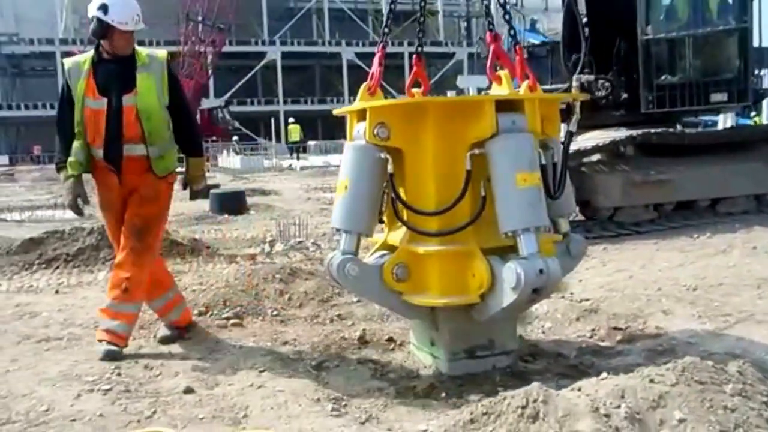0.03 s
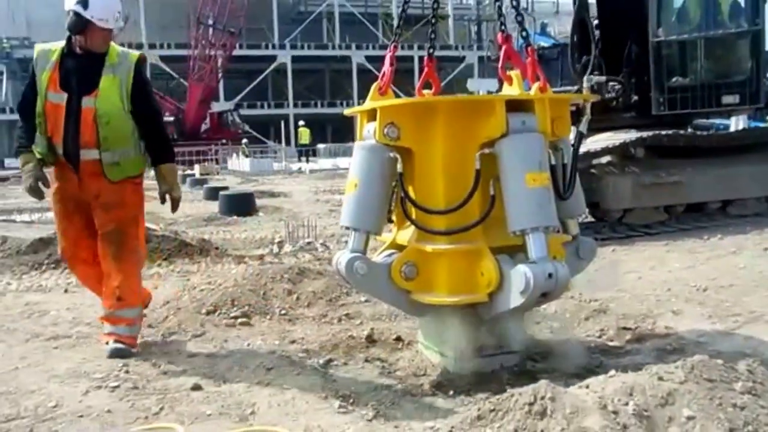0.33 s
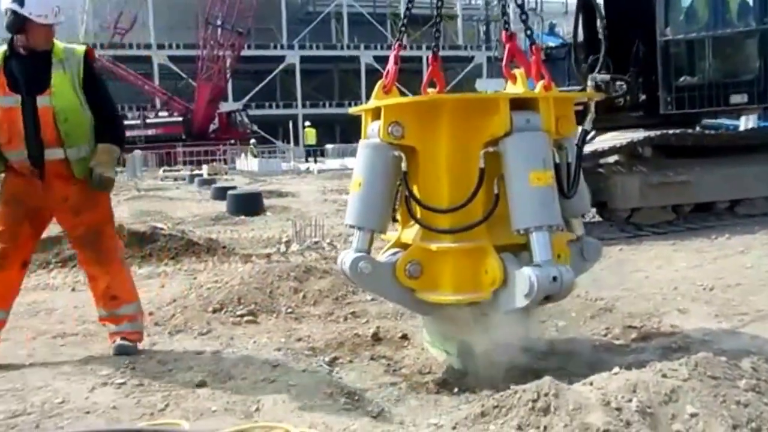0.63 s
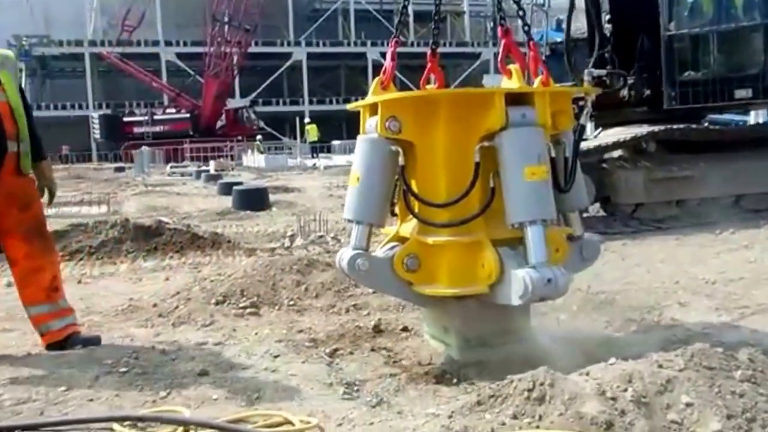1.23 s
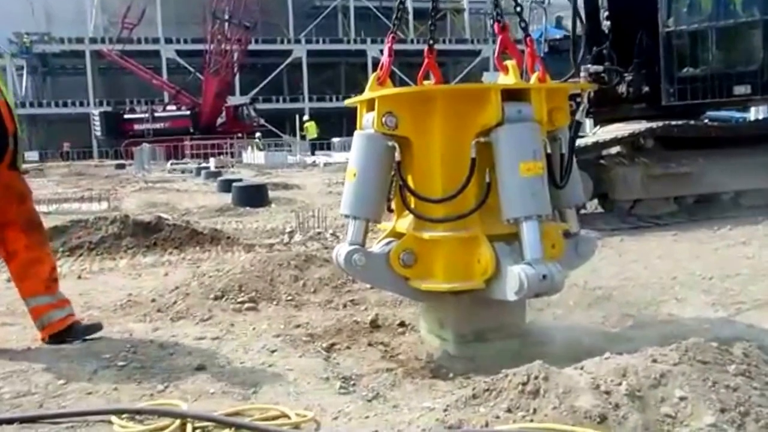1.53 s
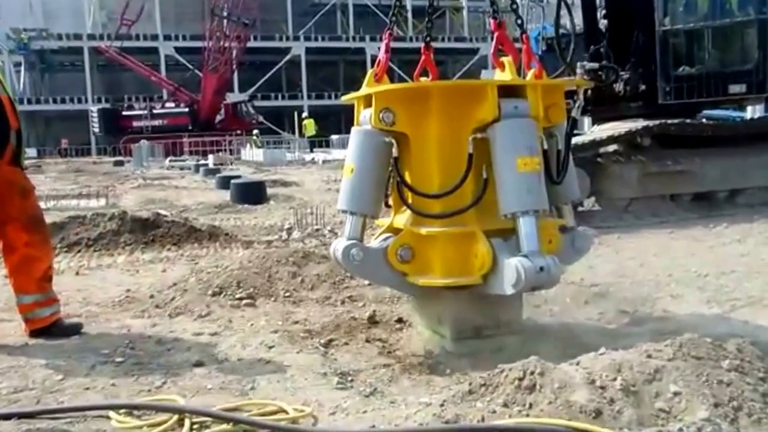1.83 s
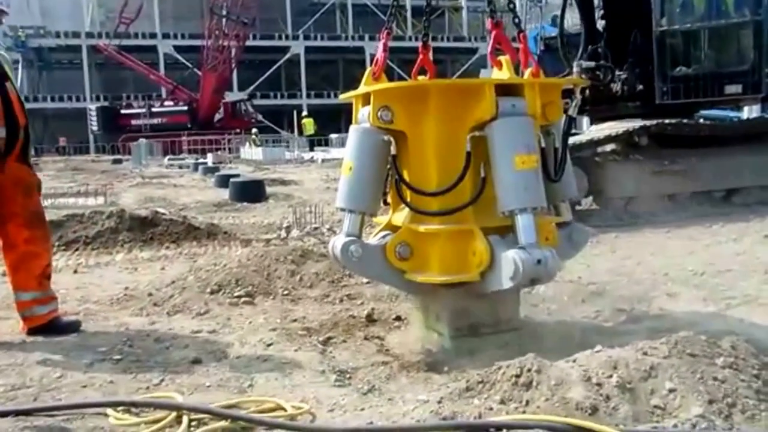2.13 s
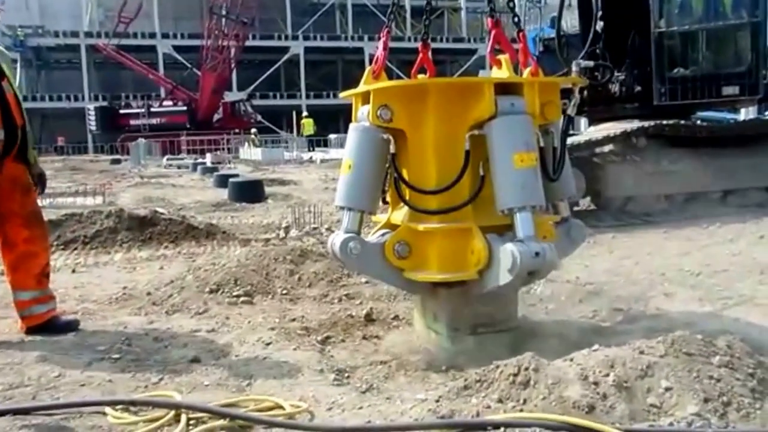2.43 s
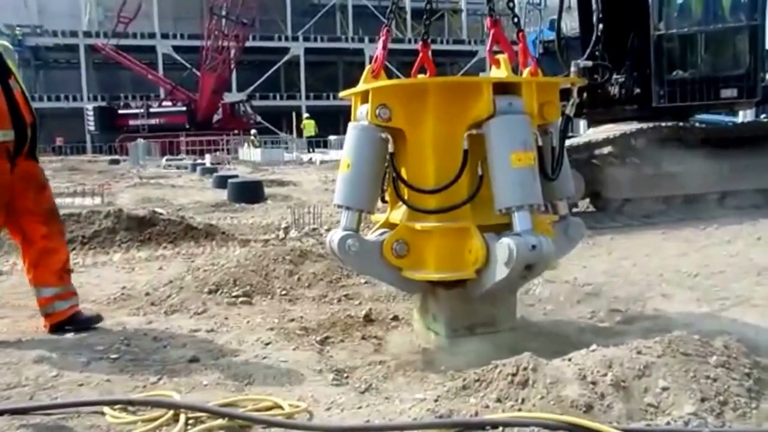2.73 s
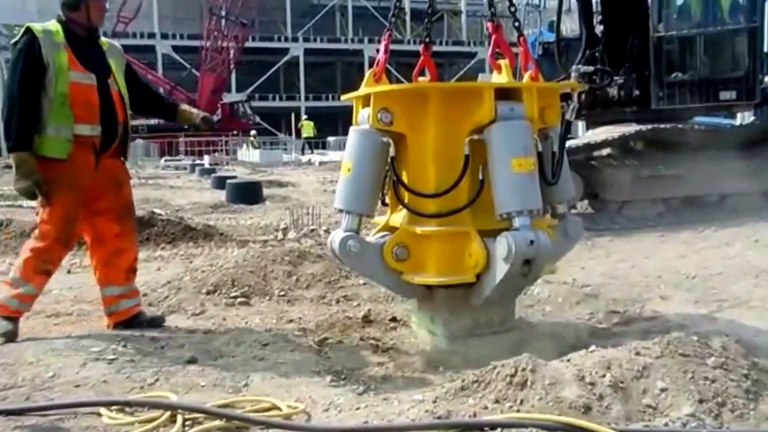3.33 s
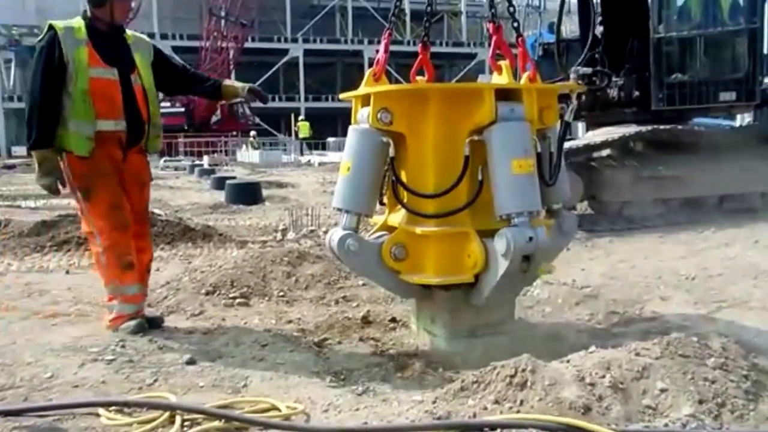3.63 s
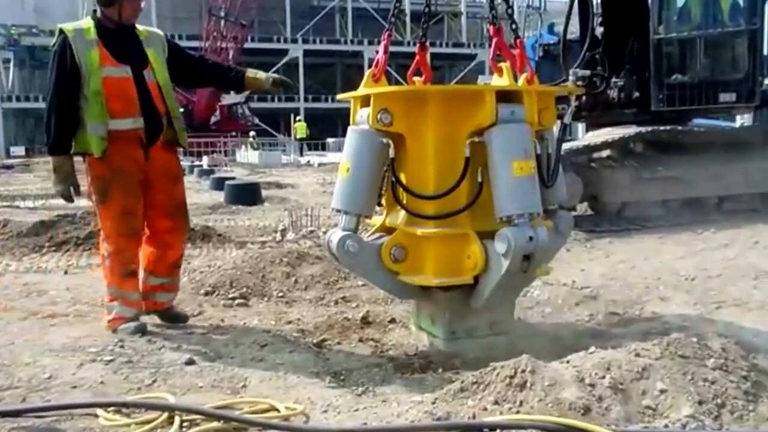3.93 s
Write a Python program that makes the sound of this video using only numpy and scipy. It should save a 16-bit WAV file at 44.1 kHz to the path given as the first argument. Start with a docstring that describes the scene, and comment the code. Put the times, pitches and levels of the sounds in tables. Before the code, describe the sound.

A concrete pile cracks with a loud, thudding crunch in a hydraulic breaker close by. Chunks crumble and fall, steel groans and chains rattle briefly, leaving an excavator's diesel rumble and faint pump whine on a building site.

```python
"""Breaking a concrete pile

A hydraulic breaker bites into concrete: three cracks, each with a thud, overload the microphone.
The fractures excite the modes of the steel frame, which also groans as the jaws slip. Concrete
crumbles, chips snap off, gravel trickles and the lifting chains rattle. Behind it are a thin hiss
and the excavator's diesel; its pump whines while holding pressure, then while driving the rams."""
import sys
import numpy as np
from scipy import signal
from scipy.fft import rfft, irfft
from scipy.io import wavfile

SR = 44100
rng = np.random.default_rng(int(sys.argv[2]) if len(sys.argv) > 2 else 0)


def to_wav(sig):
    """Store sig (one row per channel, or 1-D mono) as 16-bit WAV at the path in sys.argv[1].

    Samples outside -1..1 are clipped; the rate is SR.
    """
    pcm = np.clip(np.atleast_2d(sig), -1, 1) * 32767
    pcm = np.round(pcm).astype(np.int16)
    wavfile.write(sys.argv[1], SR, pcm.T)  # frames by channels


N = 176400
T = np.arange(N) / SR
CUTOFF_HZ, SNAP_ATTACK_S = 14400, 0.0006

# left-right coherence of nearby sources: (frequency [Hz], correlation [-1..1])
NEAR_COHERENCE = [(60, 0.99), (700, 1), (1240, 0.98), (2300, .87), (4200, 0.86), (7700, 0.32),
                  (14000, 0.18)]
# spectrum of small hard impacts: (frequency [Hz], relative density [dB])
SNAP_SPECTRUM = [(300, -6), (1000, 10.5), (2000, 2), (3500, 5), (6000, -0.5), (9000, 1), (14000, 4.5)]


def from_db(db):
    """Amplitude ratio of a level in decibels."""
    return 10 ** (np.asarray(db) / 20)


def unit_rms(x):
    """Normalisation to an rms of 1."""
    return x / np.sqrt(np.mean(x ** 2) + 1e-20)


def contour(rows):
    """Gain interpolated between (time [s], level [dB]) rows."""
    return from_db(np.interp(T, *np.transpose(rows)))


def at_hz(rows, hz):
    """Interpolation on a logarithmic frequency axis."""
    frequencies, values = np.transpose(rows)
    return np.interp(np.log(hz + 1), np.log(frequencies), values)


def drift(corner_hz):
    """Random modulation: low-passed noise with an rms of 1."""
    step, settle = 40, 2000  # audio samples per point; points discarded
    pole = np.exp(-2 * np.pi * corner_hz * step / SR)
    noise = rng.standard_normal(N // step + settle + 2)
    slow = signal.lfilter([1], [1, -2 * pole, pole * pole], noise)[settle:]
    return np.interp(np.arange(N) / step, np.arange(len(slow)), unit_rms(slow))


def burst(start, attack, hold, t60):
    """Transient envelope: linear attack, hold and exponential decay, all in seconds."""
    rise = np.clip((T - start) / attack, 0, 1)
    return rise * np.exp(-np.log(1000) * np.clip((T - start - attack - hold) / t60, 0, 2))


def ring(force, modes):
    """Modal superposition: each mode responds to the force as a damped oscillator."""
    response = 0
    for hz, db, t60 in modes:
        radius, angle = np.exp(-np.log(1000) / (t60 * SR)), 2 * np.pi * hz / SR
        feedback = [1, -2 * radius * np.cos(angle), radius ** 2]
        response += from_db(db) * signal.lfilter([0, np.sin(angle)], feedback, force + 1e-18)
    return response


def grit(per_s, spread_db, dust_db):
    """Shot noise: tiny uneven fractures over fine dust, as two signals with shared timing."""
    events = rng.random(N) < per_s / SR
    sizes = from_db(spread_db * np.minimum(rng.exponential(1, N), 4))
    impulses = unit_rms(events * sizes * rng.choice([-1, 1], (2, N)))
    return impulses + from_db(dust_db) * rng.standard_normal((2, N))


def colour(pair, spectrum, coherence, balance=None):
    """Minimum-phase filtering and mid-side mixing turn two uncorrelated signals into stereo of rms 1."""
    hz = np.fft.rfftfreq(N, 1 / SR)
    cepstrum = irfft(np.log(from_db(at_hz(spectrum, hz))), N)
    cepstrum[1:N // 2] *= 2  # folding makes the filter causal
    cepstrum[N // 2 + 1:] = 0
    mid, side = rfft(pair) * np.exp(rfft(cepstrum)) * (hz < CUTOFF_HZ)
    correlation = np.clip(at_hz(coherence, hz), -0.999, 0.999)
    sign = np.array([[1], [-1]])
    stereo = np.sqrt(1 + correlation) * mid + sign * np.sqrt(1 - correlation) * side
    if balance:
        stereo *= from_db(sign * at_hz(balance, hz) / 2)
    return unit_rms(irfft(stereo, N))


def tone(hz, harmonics, flutter_db):
    """Harmonic series on a moving fundamental; each partial flutters independently in level."""
    phase = 2 * np.pi * np.cumsum(hz) / SR
    partials = 0
    for number, db in harmonics:
        gain = from_db(db + flutter_db * drift(7.2))
        partials += gain * np.sin(number * phase + rng.uniform(0, 2 * np.pi))
    return np.sqrt(2) * partials


def hiss():
    """Band noise: a steady hiss and a higher, swelling sizzle, placed by time and level differences."""
    # steady band and higher band: (frequency [Hz], relative density [dB])
    hiss_spectrum = [(3500, -20), (5000, -10), (5600, 3.5), (6400, -5), (7700, -5), (10000, -22),
                     (14000, -22)]
    sizzle_spectrum = [(7000, -36), (10000, -11.5), (11300, -1), (12700, 3.5), (14000, -2.5)]
    # swell of the sizzle: (time [s], level [dB])
    swell = [(0, -38), (.9, -38.5), (1.9, -35), (2.5, -32), (2.85, -34), (4, -32.5)]
    # left-right coherence: (frequency [Hz], correlation [-1..1])
    coherence = [(4000, 0.87), (5600, 0.69), (14000, 1)]
    # level difference: (frequency [Hz], left minus right [dB])
    balance = [(3000, -1), (5600, 3), (8000, 0.5), (13000, -4)]
    hiss_db, right_lag_s = -32.5, 0.00006
    steady = colour(rng.standard_normal((2, N)), hiss_spectrum, coherence, balance)
    sizzle = colour(rng.standard_normal((2, N)), sizzle_spectrum, coherence, balance)
    left, right = from_db(hiss_db) * steady + contour(swell) * from_db(0.5 * drift(9)) * sizzle
    delay = np.exp(-2j * np.pi * np.fft.rfftfreq(N, 1 / SR) * right_lag_s)
    return np.array([left, irfft(rfft(right) * delay, N)])


def diesel():
    """Periodic firing radiates harmonics of the crank rate over a broadband rumble."""
    # engine orders: (multiple of the crank rate, rms level [dB])
    orders = [(2, -25.5), (3, -35.5), (4, -32), (5, -44), (6, -43.5), (7, -47.5), (8, -51), (12, -50.5)]
    # rumble: (frequency [Hz], relative density [dB])
    spectrum = [(24, -23.5), (45, 4.5), (70, -2), (110, -7.5), (150, -12.5), (220, -15), (300, -21),
                (530, -21), (1020, -23), (1680, -26.5), (3000, -29.5), (4500, -33.5), (7000, -50)]
    # left-right coherence at a distance: (frequency [Hz], correlation [-1..1])
    coherence = [(60, 0.93), (700, 0.99), (1240, 0.83), (2300, 0.98), (4200, 1)]
    crank_hz, wander, rumble_db = 23.64, 0.00795, -28.5
    firing = tone(crank_hz * (1 + wander * drift(3.37)), orders, flutter_db=1)
    rumble_gain = from_db(rumble_db + 0.73 * drift(7.8))
    return firing + rumble_gain * colour(rng.standard_normal((2, N)), spectrum, coherence)


def pump():
    """Pressure ripple gives a harmonic whine, which wavers faster when the pump holds pressure."""
    # whine when driving the rams and when holding: (harmonic number, relative level [dB])
    drive_harmonics = [(1, -11.5), (2, 1), (3, -7), (4, -9.5), (5, -13.5), (7, -15)]
    hold_harmonics = [(1, -15), (2, -5.5), (4, 2)]
    ripple_hz, wander, drive_db, hold_db = 259.1, 0.0027, -41, -42.5
    driving = tone(ripple_hz * (1 + wander * drift(7.9)), drive_harmonics, flutter_db=0.3)
    holding = tone(ripple_hz * (1 + wander * drift(21.6)), hold_harmonics, flutter_db=0)
    driving *= burst(start=1.792, attack=0.029, hold=2, t60=0.25)
    holding *= burst(start=0.2, attack=0.34, hold=0.74, t60=0.15)
    return from_db(drive_db) * driving + from_db(hold_db) * holding


def clinks():
    """Free vibration: small struck metal parts each sound one damped sinusoid."""
    # strikes: (time [s], frequency [Hz], peak level [dB], T60 [s])
    strikes = [(1.358, 1070, -28.5, 0.13), (1.785, 3580, -34.5, 0.083), (2.712, 3310, -33.5, 0.12),
               (3.196, 3100, -30.5, 0.17), (3.263, 1950, -25, 0.035)]
    return sum(from_db(db) * burst(start, SNAP_ATTACK_S, 0, t60) * np.sin(2 * np.pi * hz * (T - start))
               for start, hz, db, t60 in strikes)


def chains():
    """Impact excitation: a quick run of gritty clashes rings the inharmonic modes of the links."""
    # link collisions: (time [s], relative level [dB])
    clashes = [(.669, -23.5), (0.679, -30), (0.687, -30), (0.696, -24), (0.704, -29), (0.717, -21.5),
               (.737, -27.5), (.745, -29)]
    # modes of a link: (frequency [Hz], gain [dB], T60 [s])
    link_modes = [(2440, -12, 0.35), (3090, -0.5, 0.078), (3200, -15, 0.11), (4240, -7, 0.045),
                  (5040, -3, 0.034), (7838, -7.5, 0.043), (8732, -6, 0.04), (11500, -5, .04)]
    force = sum(from_db(db) * burst(start, SNAP_ATTACK_S, hold=0.0018, t60=0.052)
                for start, db in clashes)
    scrape = force * colour(grit(per_s=3000, spread_db=2.5, dust_db=-6), SNAP_SPECTRUM, NEAR_COHERENCE)
    starts, levels_db = np.transpose(clashes)
    links = 0
    for mode in link_modes:  # each clash excites each mode differently
        onsets = starts + rng.uniform(0, 0.001, len(starts))
        taps = np.zeros(N)
        taps[(onsets * SR).astype(int)] = from_db(levels_db + rng.normal(0, 3, len(starts)))
        links += ring(taps, [mode])
    return from_db(-0.5) * (scrape + links)


def groans():
    """Stick-slip friction: the jaws make the frame shudder; rough slips jolt its pitch and level."""
    # slips: (time [s], frequency [Hz], level [dB], hold [s], roughness [share of the pitch])
    slips = [(.182, 132, -13, .085, .015), (.515, 136, -22.5, .07, .1), (.62, 119, -25, .05, .06),
             (.735, 126, -20.5, .135, .035), (.945, 125, -25, .015, .1), (1.05, 125, -22.5, .05, .06)]
    wobble, jolt_hz, jolt_db_per_roughness = 0.02, 45, 20
    starts, hz, _, _, roughness = np.transpose(slips)
    swell = sum(from_db(db) * burst(start, attack=0.016, hold=hold, t60=0.2)
                for start, _, db, hold, _ in slips)
    latest = np.maximum(np.searchsorted(starts, T) - 1, 0)
    pitch = hz[latest] * (1 + wobble * drift(11) + roughness[latest] * drift(jolt_hz))
    jolts = from_db(jolt_db_per_roughness * roughness[latest] * drift(jolt_hz))
    return swell * jolts * tone(pitch, [(1, 0), (2, -21)], flutter_db=1.3)


def trickle():
    """Random light impacts add up to a patter as gravel runs down the pile."""
    # gravel flow: (time [s], level [dB])
    flow = [(.85, -52), (1.2, -47), (1.235, -34.5), (1.37, -37.5), (1.65, -58), (2, -75)]
    # patter: (frequency [Hz], relative density [dB])
    spectrum = [(300, -30), (900, -3.5), (3500, 1), (14000, -30)]
    return contour(flow) * colour(grit(per_s=700, spread_db=3, dust_db=-4), spectrum, NEAR_COHERENCE)


def lumps():
    """Inelastic impact: falling lumps knock with dull, quickly damped noise."""
    # landings: (time [s], level [dB], hold [s])
    landings = [(0.43, -26.5, 0.006), (0.499, -21.5, 0.0055), (0.561, -25.5, 0.056), (0.716, -31, .008),
                (0.799, -27.5, 0.0052), (1.158, -31, 0.0083), (1.228, -33, 0.0069), (1.354, -33.5, 0.01),
                (2.7, -38.5, 0.18), (3.196, -23.5, 0.0066), (3.24, -37.5, .06)]
    # knock: (frequency [Hz], relative density [dB])
    spectrum = [(100, 4), (190, 1.5), (450, -1), (850, 0), (1500, -9.5), (3200, -8.5), (4800, -18),
                (14000, -44)]
    force = sum(from_db(db) * burst(start, attack=0.0022, hold=hold, t60=0.11)
                for start, db, hold in landings)
    return force * colour(grit(per_s=1500, spread_db=3.5, dust_db=-3), spectrum, NEAR_COHERENCE)


def crumble():
    """Acoustic emission: the many small fractures of grinding concrete merge into a fluttering noise."""
    # course of the crumbling: (time [s], level [dB])
    activity = [(0, -30), (.13, -21), (.18, -29), (.26, -33), (.33, -41), (.48, -36.5), (.58, -27),
                (.65, -30.5), (.8, -40), (.87, -39), (.98, -34), (1.17, -34.5), (1.36, -39.5), (1.55, -52),
                (4, -58)]
    # crumbs: (frequency [Hz], relative density [dB])
    spectrum = [(100, -7.5), (170, 7), (380, -2), (700, -5.5), (1500, -14.5), (3200, -11), (6000, -20.5),
                (10000, -12), (14000, -23.5)]
    gain = contour(activity) * from_db(1.8 * drift(19))
    return gain * colour(grit(per_s=1100, spread_db=3, dust_db=-5), spectrum, NEAR_COHERENCE)


def chips():
    """Spalling: each chip snaps off with a short burst of grit in its own frequency band."""
    # snaps: (time [s], level [dB], hold [s], band centre [Hz], band reach each way [ratio])
    snaps = [(0.037, -22.5, .002, 9000, 1.2), (.1005, -5, 0.0025, 4000, 1.7),
             (0.237, -28.5, 0.0036, 9000, 1.2), (.361, -32.5, .002, 8000, 1.7),
             (0.505, -25, 0.0067, 6000, 3.5), (0.553, -21.5, 0.005, 6000, 6.4),
             (0.811, -24, 0.0014, 8700, 1.1), (0.914, -26.5, 0.0025, 6500, 1.8),
             (0.943, -26, 0.002, 9500, 1.5), (0.994, -26.5, 0.006, 7000, 2.1),
             (1.043, -24.5, 0.002, 3480, 1.3), (1.123, -23.5, 0.0025, 8500, 1.3),
             (1.2635, -20.5, 0.0027, 6540, 2.2)]
    grains = colour(grit(per_s=4000, spread_db=3, dust_db=-7), SNAP_SPECTRUM, NEAR_COHERENCE)
    sound = 0
    for start, db, hold, hz, ratio in snaps:
        band = signal.butter(1, [hz / ratio, min(hz * ratio, CUTOFF_HZ)], "band", fs=SR, output="sos")
        force = burst(start, SNAP_ATTACK_S, hold, t60=0.03)
        sound += from_db(db) * np.std(force) * unit_rms(force * signal.sosfilt(band, grains))
    return sound


def thud(start, hold, hz):
    """Damped oscillation of the released jaws, sagging in pitch as the load lets go."""
    sag_share, sag_s = 0.23, 0.032
    age = np.maximum(T - start, 0)
    pitch = hz * (1 - sag_share * (1 - np.exp(-age / sag_s)))
    phase = 2 * np.pi * np.cumsum(pitch * (age > 0)) / SR
    return burst(start, attack=0.0024, hold=hold, t60=0.11) * np.sin(phase)


def cracks():
    """Brittle fracture: each split releases strain energy as a dense run of impulses and a thud."""
    # splits of the pile: (time [s], level [dB], hold [s], thud level [dB], thud frequency [Hz])
    splits = [(0.038, -10, 0.009, -10.5, 150), (0.0683, -7, 0.01, -9, 153), (0.0958, -3, 0.015, 3, 139.4)]
    # fracture noise: (frequency [Hz], relative density [dB])
    spectrum = [(60, -27), (100, -11), (165, -1), (230, -4), (300, -8.5), (370, -1), (480, -10.5),
                (640, -1.5), (850, -13), (1350, -14), (1700, -19), (2900, -20), (5500, -25), (8000, -33),
                (14000, -38)]
    force = sum(from_db(db) * burst(start, attack=0.0018, hold=hold, t60=0.086)
                for start, db, hold, _, _ in splits)
    fractures = colour(grit(per_s=1400, spread_db=1.5, dust_db=-9), spectrum, NEAR_COHERENCE)
    thuds = sum(from_db(db) * thud(start, hold, hz) for start, _, hold, db, hz in splits)
    return force * fractures + thuds


def frame(force):
    """Resonance: the breaking concrete drives the modes of the steel frame."""
    # frame modes: (frequency [Hz], relative gain [dB], T60 [s])
    modes = [(175.4, -6.5, 0.37), (362.4, -7, 0.31), (550, -3, 0.14), (655, -14, 0.24), (791, 2, 0.15),
             (1056, 9.5, 0.085), (1360, -3, 0.19), (1451, 6, 0.21), (1938, -1, 0.23), (2475, -7, 0.16)]
    coupling_db = -53.5
    return from_db(coupling_db) * ring(force, modes)


def echoes(direct):
    """Reflection: the machines and a building return dull, delayed copies of the sound."""
    # reflections: (delay [s], gain [dB])
    paths = [(.083, -27), (.131, -27.5)]
    dull = signal.sosfilt(signal.butter(1, [200, 2940], "band", fs=SR, output="sos"), direct)
    return sum(from_db(db) * np.pad(dull, ((0, 0), (int(delay * SR), 0)))[:, :N] for delay, db in paths)


def scene():
    """Superposition of the breaker, its echoes and the background."""
    concrete = cracks() + crumble() + lumps() + trickle() + chips()
    breaker = concrete + frame(concrete) + chains() + clinks() + groans()
    return breaker + echoes(breaker) + diesel() + pump() + hiss()


def record(dry):
    """Saturation rounds off the peaks of the cracks; a steep low-pass cuts the highest treble."""
    ceiling = 0.92
    clipped = dry / (1 + (dry / ceiling) ** 8) ** (1 / 8)
    return signal.sosfilt(signal.ellip(12, 0.1, 70, CUTOFF_HZ, fs=SR, output="sos"), clipped)


dry = scene()
out = record(dry)
to_wav(out)
```